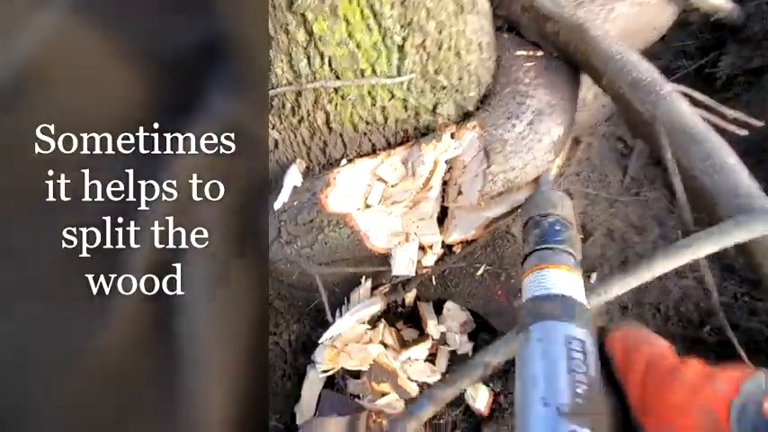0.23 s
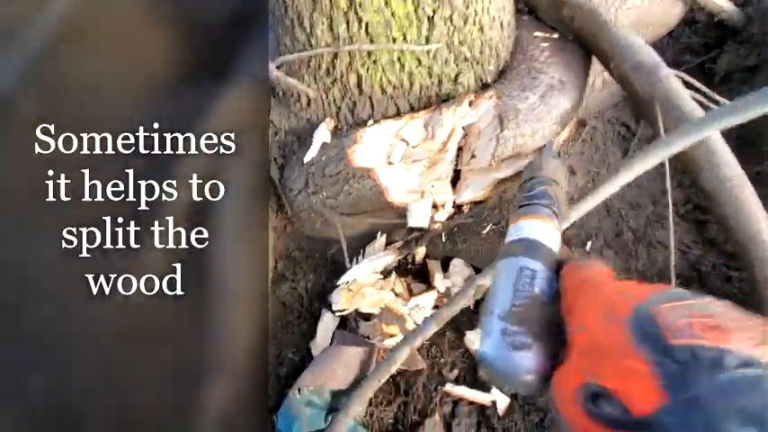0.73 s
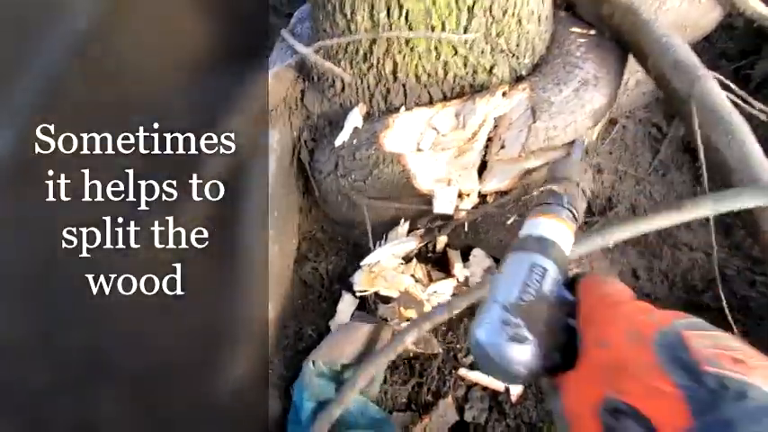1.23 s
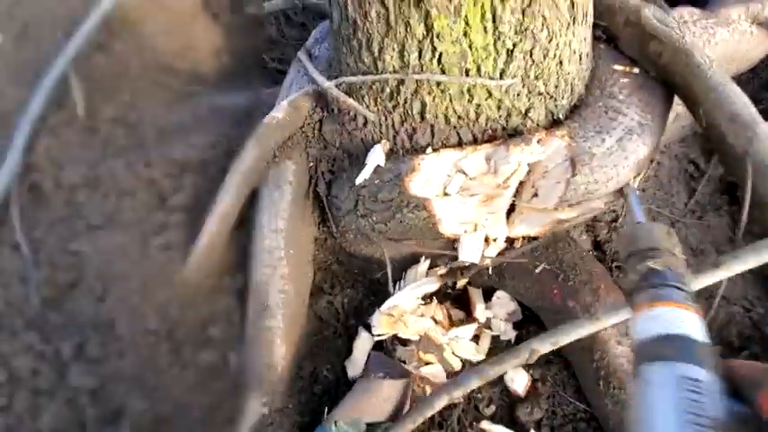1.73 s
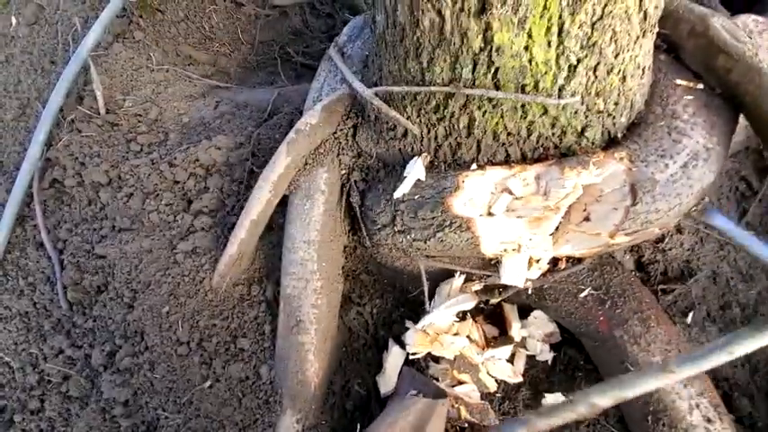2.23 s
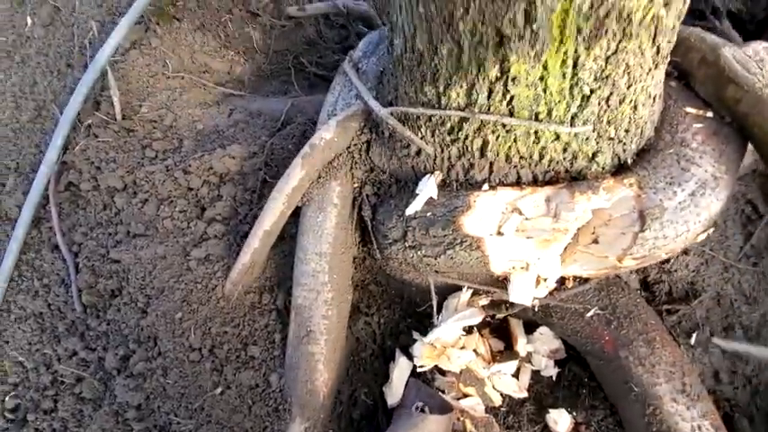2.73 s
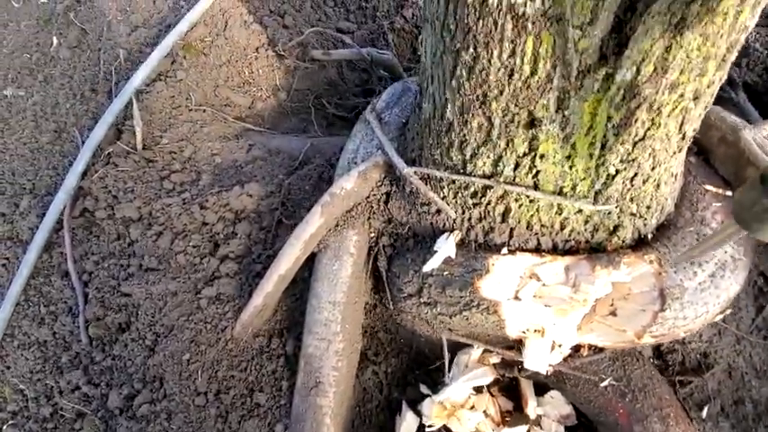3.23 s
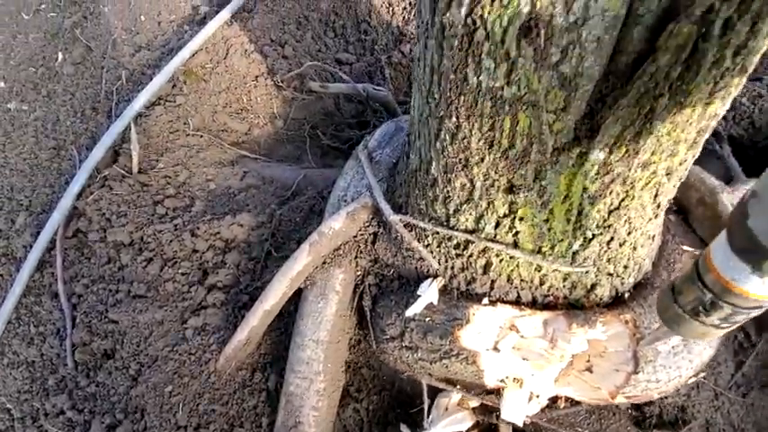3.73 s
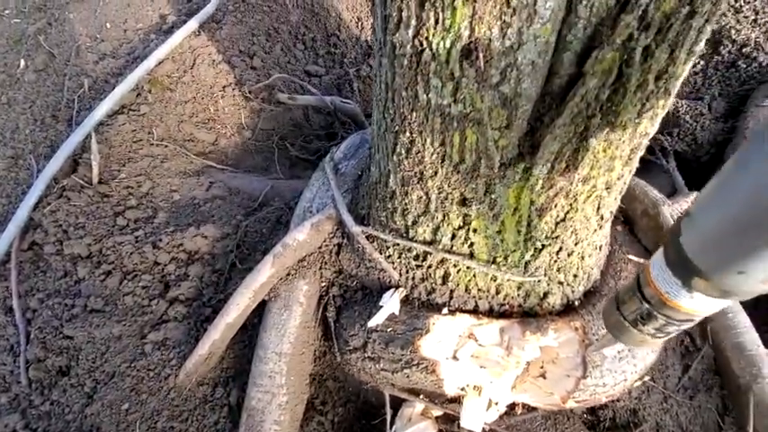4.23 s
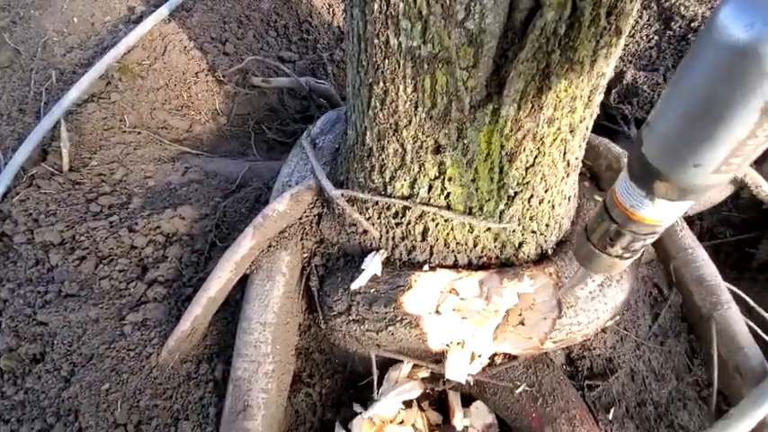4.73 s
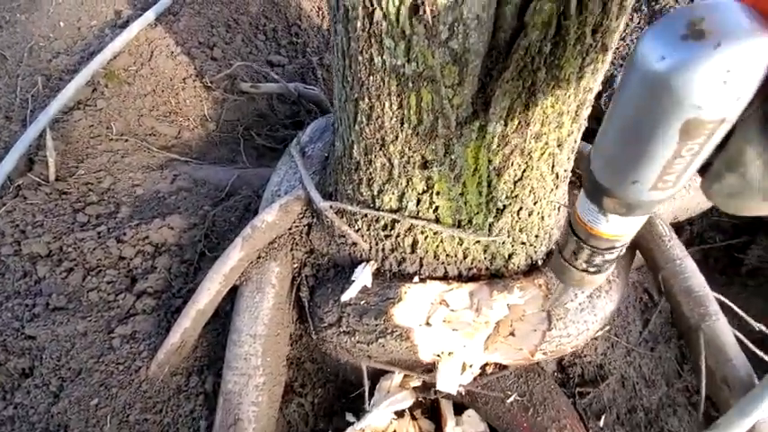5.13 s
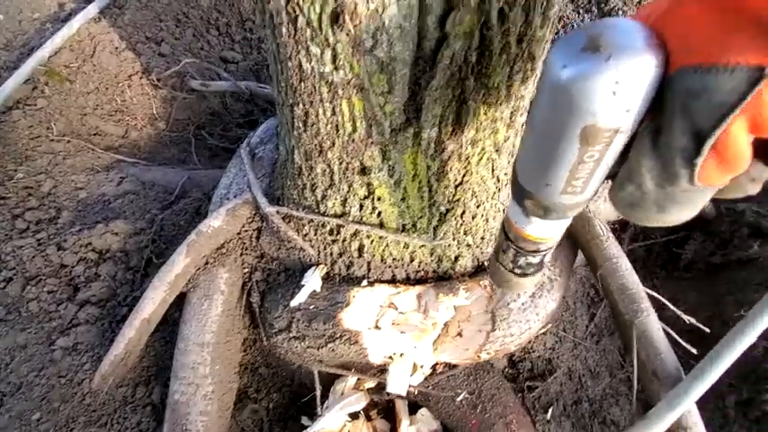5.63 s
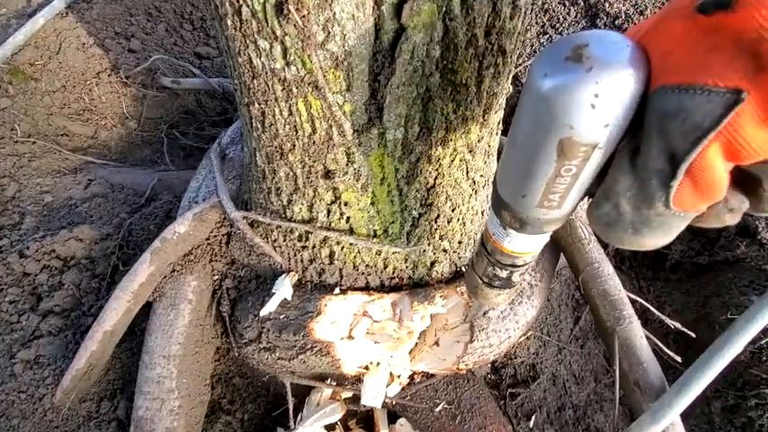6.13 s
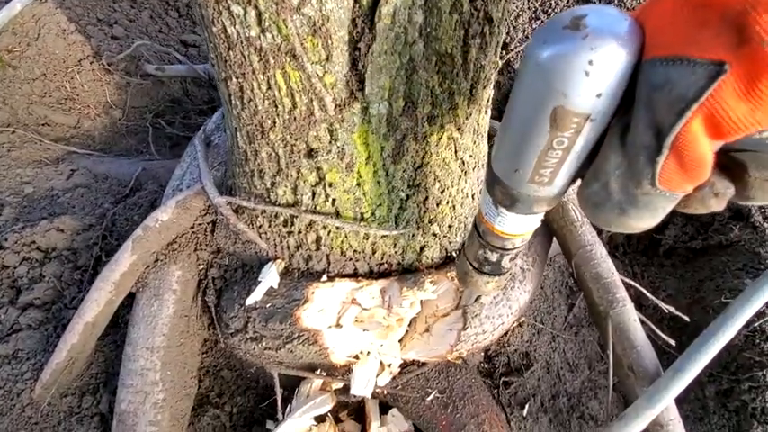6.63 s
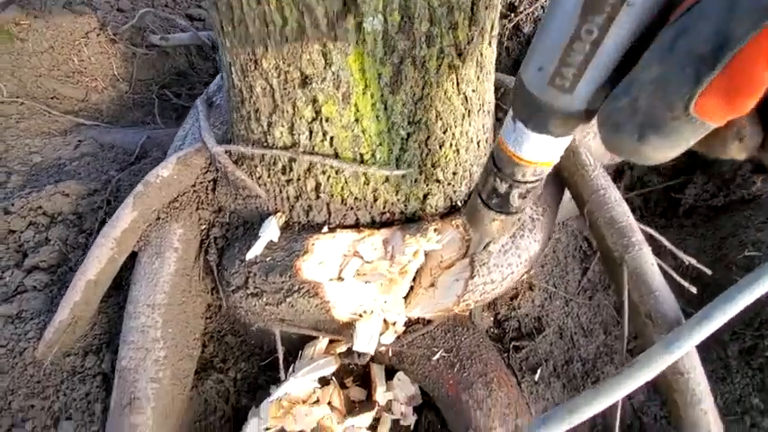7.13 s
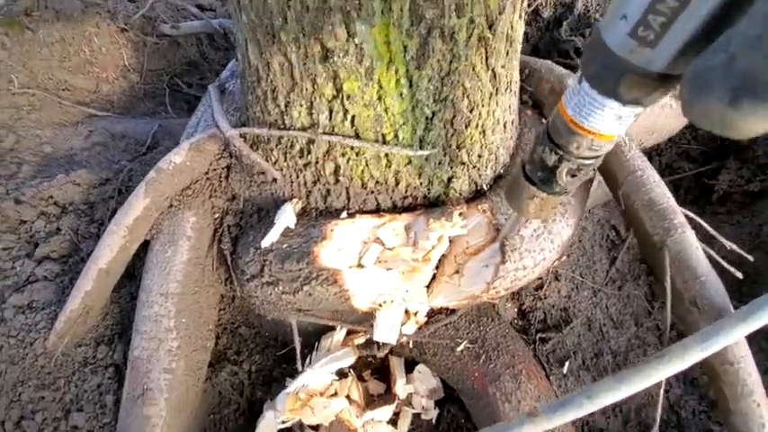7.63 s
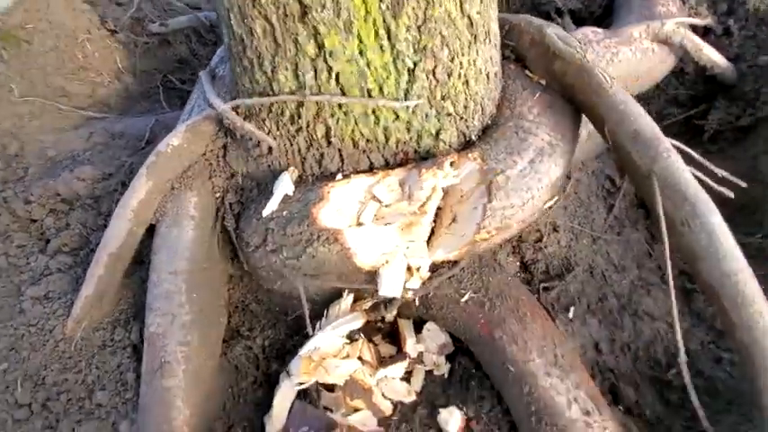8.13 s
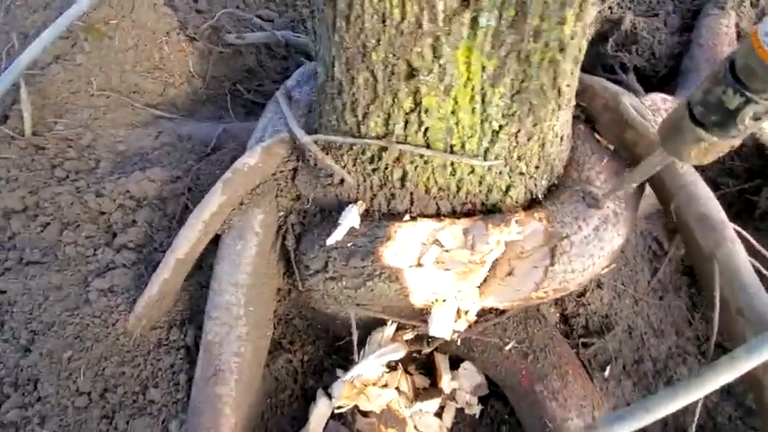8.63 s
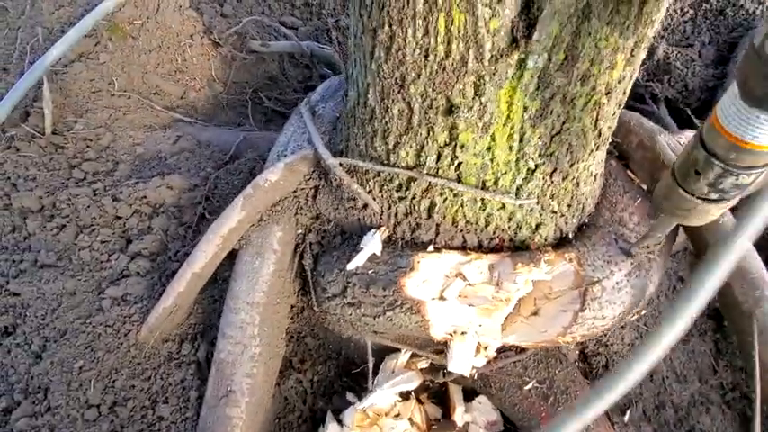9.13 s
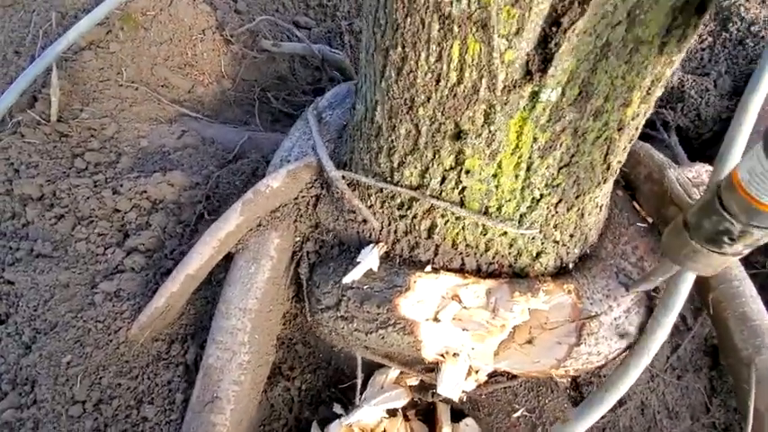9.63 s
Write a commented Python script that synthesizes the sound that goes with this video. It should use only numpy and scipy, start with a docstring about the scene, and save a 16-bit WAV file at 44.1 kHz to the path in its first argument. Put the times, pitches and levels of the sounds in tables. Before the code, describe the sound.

A compressor engine drones outdoors throughout, with an air leak that hisses and gives a thin, wavering whistle. At about 0.4 seconds an air chisel, close and slightly to the left, fires three quick blows with hollow thuds on a tree root. The compressor swells, and the loose bit and hose give scattered light metallic clicks until about 3.5 seconds.

From 4.7 to 7.1 seconds the chisel hammers loudly and rapidly, slowing slightly as the bit seats. The rattle combines sharp steel cracks, low thumps, wooden knocks and puffing exhaust air, with a growing dry rasp of tearing fibres. The compressor sinks beneath it.

More clicks follow between 7.1 and 9 seconds, and the drone swells again around 8.2 seconds. At 9.6 seconds a short, faster burst of hammering ends the scene.

```python
"""An air chisel is driven into a tree root outdoors, close to the left microphone port. First a compressor
engine drones and a leak hisses and whistles; at 0.4 s a feathered trigger fires three blows. The background
swells and the tool clicks as it is moved. From 4.7 to 7.1 s the chisel hammers and the bit seats: each piston
cycle is a thump, a steel crack with a knock of the wood, a return thump and a puff of exhaust. More clicks
follow over the drone, and at 9.6 s a short, faster burst ends the scene."""
import sys
import numpy as np
from scipy import signal
from scipy.fft import rfft, irfft, next_fast_len
from scipy.io import wavfile

SR = 44100
rng = np.random.default_rng(int(sys.argv[2]) if len(sys.argv) > 2 else 0)


def transcribe(u):
    """Save the signal u as a 16-bit wav file named by the first command-line argument.

    u: samples, shape (n,) or (channels, n), limited to [-1, 1]; the rate is SR.
    q: integer samples, one column per channel.
    """
    v = np.clip(np.atleast_2d(u).T, -1, 1)
    q = np.round(v * 32767).astype(np.int16)
    wavfile.write(sys.argv[1], SR, q)


N = 436590
TIME = np.arange(N) / SR
FFT_SIZE = next_fast_len(N + 8192)
BIN_HZ = np.maximum(np.arange(FFT_SIZE // 2 + 1) * SR / FFT_SIZE, 1)

# Table levels are relative: each layer adds its own trim.
# stereo image of the noises: f/Hz, left-right likeness/0-1
LIKENESS = [(60, 0.41), (250, 0.45), (600, 0.27), (2000, 0.69), (4000, 0.06), (9000, 0.33), (16000, .3)]
# how much duller the right port hears the compressor and the tool: f/Hz, level/dB
ENGINE_SHADE = [(60, -1.4), (220, -3), (500, -6.5), (900, -12), (1800, -2), (3000, -8.5), (4400, -7),
                (6000, -14), (8000, -26), (10500, -14), (15600, -21)]
TOOL_SHADE = [(60, -7), (300, -5.5), (600, -9.5), (1100, -12), (1600, -11), (2150, -5), (2900, -15),
              (4200, -7.5), (6000, -20.5), (8000, -25), (9200, -25), (15600, -24)]

# engine orders, with weak quarter orders from the slower pump: multiple of the crank rate, level/dB
ENGINE_ORDERS = [(1, 0), (1.25, -80), (1.5, -24), (1.75, -23), (2, -5), (2.75, -26.5), (3, -45), (3.5, -38),
                 (4, -34), (5, -34.5), (6, -36.5), (7, -52)]
# colour of the engine clatter: f/Hz, level/dB
CLATTER_EQ = [(25, 11), (50, 21), (100, 13), (190, 16.5), (250, 10), (330, 3.5), (620, 3), (820, 1),
              (1050, 1), (1330, 0.5), (1620, -0.5), (2050, 1), (3200, -2), (4400, -1.5), (15000, -42)]
# whines of pump and fan: f/Hz, level/dB
WHINES = [(220.3, -23), (564.3, -29.5), (673, -39), (996, -34.5), (1130.2, -38.5)]
# colours of the leak's hiss and of its breathy upper tone: f/Hz, level/dB
HISS_EQ = [(2500, -14), (4500, 3), (6200, 3.5), (7400, -3.5), (9200, 3.5), (12000, 0), (15600, -1),
           (16500, -20)]
BREATHY_EQ = [(3000, -43), (4000, -25), (4330, -9), (4470, 3), (4640, -5.5), (5200, -29), (7000, -55)]
# fader ride of the whistle: t/s, pure tone level/dB, breathy tone level/dB
WHISTLE_RIDE = [(.25, -26, -42), (.7, -31, -41), (2, -29, -29), (2.5, -34, -30), (3.05, -25, -28),
                (3.6, -26.5, -32), (3.8, -21, -32), (3.95, -28.5, -28), (4.55, -28, -29), (7.25, -34, -42),
                (7.55, -24, -36), (8.2, -26, -23), (8.75, -24.5, -42), (9.05, -34, -49), (9.55, -31.5, -47)]
# the background sinks around the work, then swells: sink t/s, swell t/s, level/dB
LULLS = [(-.1, 0.752, -8), (4.652, 8.163, -9), (9.622, 9.9, -11)]
# swing of the microphone from the root towards the trunk: t/s, share/0-1
MIC_SWING = [(0, 0), (1.2, 0.29), (2.8, 0.18), (3.35, 0.85), (4.5, .9), (7.6, 0.72), (8.2, 0.07), (9.2, .9)]

# clicks of the loose bit and hose: t/s, level/dB, ring f/Hz, decay/s
CLICKS = [(0.8193, -19.5, 12000, .001), (1.0347, -24, 11930, .002), (1.3243, -10, 12060, 0.00068),
          (2.3857, -19.5, 8920, .0022), (3.4826, -17.5, 8050, .004), (3.509, -21, 3800, 0.015),
          (3.5301, -21, 5270, 0.0056), (7.1182, -23, 9000, 0.0018), (7.2082, -8.5, 4340, 0.0018),
          (7.246, -22, 5200, 0.0017), (7.265, -28, 5800, .002), (7.4594, -15.5, 8500, 0.0007),
          (7.8863, -23, 8040, .001), (7.974, -23, 9000, .003), (8.0509, -17.5, 6700, 0.0025),
          (8.065, -23, 9000, 0.0027), (8.0792, -18, 12000, .0018), (8.183, -22, 10000, .0018),
          (8.5013, -19.5, 10950, 0.0035), (9.049, -22.5, 9050, 0.0018)]
# trigger pulls: open t/s, close t/s, rush level/dB, treble over rush/dB, opening spit level/dB
TRIGGER_PULLS = [(0.368, 0.394, -37.5, -2.5, -42), (0.397, .502, -39.5, -5, -25),
                 (4.644, 7.058, -28, -8, -20), (7.077, 7.1, -34.5, -9, -40), (9.634, 9.903, -32, -2, -21.5)]
# colours of the exhaust's rush and of its bright spray: f/Hz, level/dB
RUSH_EQ = [(150, 5.5), (500, -0.5), (1000, -5), (1700, -7), (2600, -2), (4300, 2), (5800, -1.5),
           (7300, -12), (9000, -20), (16000, -40)]
SPRAY_EQ = [(5000, -3.5), (7400, -6.5), (9000, 4), (11500, -5.5), (14500, -3), (15650, -5), (16500, -20)]
# how hard the hand leans on the tool: t/s, level/dB
HAND_PUSH = [(4.67, 3), (4.85, 5.5), (5.1, 0.9), (5.8, 0.8), (5.95, 3.5), (6.42, -1.5), (6.65, 4), (6.8, 0),
             (7.07, 1)]
# piston speed in the two bursts, slowing as the bit seats: t/s, blow rate/Hz
LONG_BURST = [(4.6716, 36.07), (5.1, 34.17), (5.5, 33.13), (6.3, 32.66), (6.6, 33.21), (7.07, 32.89)]
LAST_BURST = [(9.6555, 42.5), (9.8, 39.9), (9.895, 39.3)]
# sustained bursts: speed curve, crack/dB, wood/dB, split/dB, high ring/dB, background dip/dB
BURSTS = [(LONG_BURST, -10.5, -24, -15, -23, -5.5), (LAST_BURST, -18, -23.5, -3, -7, -8.5)]
# lone blows as the trigger is feathered or let go:
# t/s, crack/dB, wood/dB, wood pitch ratio, split/dB, high ring/dB
LONE_BLOWS = [(0.4148, -10, -35, 1.4, -20, -36), (.449, -11.5, -37, 1.2, -22.5, -32),
              (0.4883, -15, -37, 0.51, -19.5, -38), (4.662, -12, -42, 1, -44, -28),
              (7.107, -11.5, -30, .81, -21, -32), (9.6426, -8.5, -25, 0.85, -17, -31)]
# low, hollow thuds with the lone blows and a few knocks: t/s, level/dB, f/Hz
THUDS = [(0.407, -12.5, 227), (0.4465, -23, 275), (.485, -19.5, 260), (7.208, -27, 550),
         (7.949, -21.5, 340), (9.641, -13.5, 298)]
# modes of the root under the bit: f/Hz, level/dB, t60/s
WOOD_MODES = [(332.6, -7, 0.045), (588, 2.5, 0.019), (734, -14.5, 0.021), (1214, -8, 0.036),
              (1576, -9.5, 0.031), (2290, -9, 0.016)]
# colours of tearing fibres, the steel crack and the bit's high ring: f/Hz, level/dB
SPLIT_EQ = [(500, -29), (1000, 1), (1350, 2.5), (1700, -1), (2250, 2.5), (2900, -9), (4000, -17.5)]
CRACK_EQ = [(400, -27), (900, -23), (1500, -16), (2300, -3), (3000, 5), (5500, 2.5), (7400, -3), (8900, 3),
            (10400, 4), (13000, -3), (14600, -0.5), (15650, 4), (16500, 9.5)]
HIGH_RING_EQ = [(13500, -52), (15000, -9), (15650, 12), (15900, -6), (16500, -31)]


def from_db(db):
    """Decibels to gain."""
    return 10 ** (np.asarray(db) / 20)


def in_time(rows):
    """Each column of an automation curve, sample by sample."""
    times, *columns = np.transpose(rows)
    return [np.interp(TIME, times, column) for column in columns]


def over_hz(points):
    """An EQ curve, bin by bin."""
    hz, value = np.transpose(points)
    return np.interp(np.log(BIN_HZ), np.log(hz), value)


def drift(rate_hz):
    """A random wobble with a spread of about one."""
    knots = rng.standard_normal(int(N / SR * rate_hz) + 2)
    return np.interp(TIME * rate_hz, np.arange(len(knots)), knots)


def gate(start, stop, attack_s, release_s):
    """Rises to one from the start, holds, and falls back after the stop."""
    return np.clip(np.minimum((TIME - start) / attack_s, 1 - (TIME - stop) / release_s), 0, 1)


def delayed(x, lag_s):
    """The same sound a little later; the lag may move."""
    return np.interp(TIME - lag_s, TIME, x)


def noise(eq, shade, band):
    """Coloured stereo noise with unit power within the band (Hz) on the left; the right is shaded."""
    white = rng.standard_normal((2, len(BIN_HZ))) + 1j * rng.standard_normal((2, len(BIN_HZ)))
    alike, gain = over_hz(LIKENESS), from_db(over_hz(eq))
    in_band = (BIN_HZ > band[0]) & (BIN_HZ < band[1])
    gain *= FFT_SIZE / (2 * np.sqrt(np.sum(gain[in_band] ** 2)))
    right = (alike * white[0] + np.sqrt(1 - alike ** 2) * white[1]) * from_db(over_hz(shade))
    return irfft(np.array([white[0], right]) * gain, FFT_SIZE)[:, :N]


def at_ports(x, shade):
    """A mono sound in stereo: untouched on the left, shaded on the right."""
    right = irfft(rfft(x, FFT_SIZE) * from_db(over_hz(shade)), FFT_SIZE)[:N]
    return np.array([x, right])


def strikes(times, sizes):
    """A train of one-sample impulses."""
    return np.bincount(np.maximum(times * SR, 0).astype(int), sizes, N)[:N] + 1e-18


def ring(hits, hz, t60):
    """Each impulse sets a sine of its own height ringing."""
    radius, angle = from_db(-60 / (t60 * SR)), 2 * np.pi * hz / SR
    return signal.lfilter([0, np.sin(angle)], [1, -2 * radius * np.cos(angle), radius ** 2], hits)


def fade(hits, decay_s):
    """Each impulse starts an exponential decay."""
    return signal.lfilter([1], [1, -np.exp(-1 / (decay_s * SR))], hits)


def swell(hits, width_s):
    """Each impulse becomes a bell-shaped swell around its moment."""
    lag = np.arange(-1024, 1025) / SR
    return signal.oaconvolve(hits, np.exp(-.5 * (lag / width_s) ** 2), "same")


def ground_comb(x, lag_s, strength=0.16, dull_hz=2900):
    """A dull reflection from the soil hollows the sound like a moving comb."""
    dull = signal.sosfiltfilt(signal.butter(2, dull_hz, fs=SR, output="sos"), x)
    return x + strength * np.array([delayed(port, lag_s) for port in dull])


def engine(swing, crank_hz=56.12, drone_db=1.08, clatter_db=-19, throb=0.1):
    """The bed: a drone on the orders of the crankshaft, and clatter that throbs on each turn."""
    turn = 2 * np.pi * crank_hz * TIME + .025 * drift(14)
    drone = np.zeros(N)
    for order, db in ENGINE_ORDERS:
        waver = 1 + 0.038 * (order - .5) * drift(20)
        drone -= np.sqrt(2) * from_db(db + drone_db) * np.cos(order * turn) * waver
    clatter = noise(CLATTER_EQ, ENGINE_SHADE, band=(600, 2500))
    clatter = ground_comb(clatter, lag_s=0.000954 + 0.00023 * swing)
    clatter *= from_db(clatter_db - 1.5 * swing) * (1 + throb * np.cos(turn))
    return at_ports(drone, ENGINE_SHADE) + clatter


def whines(swing, trim_db=4, swing_db=-2, waver_db=3, swing_lag_s=0.00034):
    """Wavering tones of pump and fan; the two ports drift out of phase as the microphone swings."""
    tones = np.zeros(N)
    for hz, db in WHINES:
        gain = from_db(db + trim_db + swing_db * swing + waver_db * drift(8))
        tones += gain * np.sin(2 * np.pi * hz * TIME + drift(9))
    left, right = at_ports(np.sqrt(2) * tones, ENGINE_SHADE)
    return np.array([left, delayed(right, swing_lag_s * swing)])


def leak(swing, whistle_hz=3957, whistle_db=11, right_db=-4.5, pulse_hz=28, hiss_db=-24):
    """A fitting hisses and whistles; the pulsing supply warbles the whistle, and its upper tone sputters."""
    pure_db, breathy_db = in_time(WHISTLE_RIDE)
    warble = 0.7 * np.sin(2 * np.pi * pulse_hz * TIME)
    phase = 2 * np.pi * whistle_hz * TIME + warble + 0.92 * drift(11) + 0.25 * drift(120)
    whistle = from_db(pure_db + whistle_db + 3.5 * drift(70)) * np.sin(phase)
    breathy = noise(BREATHY_EQ, ENGINE_SHADE, band=(4000, 5000)) * from_db(breathy_db + 3 * drift(60))
    hiss = noise(HISS_EQ, ENGINE_SHADE, band=(9000, 15000)) * from_db(hiss_db - 5.5 * swing)
    return whistle * from_db([[0], [right_db]]) + breathy + hiss


def compressor_fader(steady_db=-15.5, sink_s=0.06):
    """Gain of the compressor: steady, lower in each lull, and lower still while the chisel hammers."""
    lull_db = sum(db * gate(sinks, swells, sink_s, release_s=0.32) for sinks, swells, db in LULLS)
    dip_db = sum(db * gate(speed[0][0], speed[-1][0], sink_s, release_s=.12) for speed, *_, db in BURSTS)
    return from_db(steady_db + lull_db + dip_db)


def handling(trim_db=-3.5):
    """The loose bit and hose give short metallic clicks, each bright around a pitch of its own."""
    clicks, t = np.zeros(N), TIME[:2048]
    for at, db, hz, decay_s in CLICKS:
        band = signal.butter(1, [hz / 1.8, min(hz * 1.4, .45 * SR)], "band", fs=SR, output="sos")
        click = signal.sosfilt(band, rng.standard_normal(len(t)) * np.exp(-t / decay_s))
        start = int(at * SR)
        clicks[start:start + len(t)] += from_db(db + trim_db) * 2 * click / np.abs(click).max()
    return at_ports(clicks, TOOL_SHADE)


def air_flow(open_s=0.0056, close_s=0.011, spit_s=0.023, sag_s=0.12):
    """Envelopes of the rush and its treble: each pull opens with a spit, sags to a steady flow and shuts."""
    flow, treble = np.zeros((2, N))
    push_db = 0.41 * in_time(HAND_PUSH)[0]
    for opens, closes, rush_db, treble_db, spit_db in TRIGGER_PULLS:
        valve = gate(opens, closes, open_s, close_s)
        age = np.maximum(TIME - opens - open_s, 0)
        fresh = np.exp(-age / sag_s)   # a rested hose gives extra air and treble until its pressure sags
        rush = from_db(rush_db + push_db + 2.5 * fresh)
        spit = from_db(spit_db) * np.exp(-age / spit_s)
        flow += valve * np.hypot(rush, spit)
        treble += valve * np.hypot(rush * from_db(treble_db + 5 * fresh), spit * from_db(-6.5))
    return flow, treble


def exhaust(at, trim_db=-2, puff_delay_s=0.019, flutter_db=2.5):
    """Air rushes while the trigger is held and puffs out on each return stroke."""
    flow, treble = air_flow()
    strokes = strikes(at + puff_delay_s, rng.uniform(0.26, 2.0, len(at)))
    puffs = 1 + 0.77 * swell(strokes, width_s=0.0021)
    rush = flow * noise(RUSH_EQ, TOOL_SHADE, band=(2000, 6500))
    spray = treble * noise(SPRAY_EQ, TOOL_SHADE, band=(9000, 15000))
    return (rush + spray) * puffs * from_db(trim_db + flutter_db * drift(300))


def piston_blows(seat_s=0.46, cut_s=1, loose_pitch=0.757, seated_pitch=1.028):
    """The hit list, in the columns of LONE_BLOWS: those blows, then one per piston cycle of each burst."""
    rows = [np.array(LONE_BLOWS)]
    for speed, crack_db, wood_db, split_db, ring_db, _ in BURSTS:
        knots, rate_hz = np.transpose(speed)
        t = TIME[(TIME >= knots[0]) & (TIME <= knots[-1])]
        cycles = np.cumsum(np.interp(t, knots, rate_hz)) / SR
        at = np.interp(np.arange(int(cycles[-1]) + 1), cycles, t)
        age = at - at[0]
        push_db = np.interp(at, *np.transpose(HAND_PUSH))
        loose = np.exp(-(age / seat_s) ** 4)   # the wood rings lower and weaker until it grips the bit
        uncut = np.exp(-age / cut_s)   # a deeper cut knocks louder and tears more fibres
        knock_db = wood_db + push_db - 5 * loose - 3.5 * uncut
        pitch = seated_pitch + (loose_pitch - seated_pitch) * loose
        tear_db = split_db + push_db - 40.5 * uncut
        columns = [at, crack_db + push_db, knock_db, pitch, tear_db, np.full(len(at), ring_db)]
        rows.append(np.transpose(columns))
    return np.vstack(rows).T


def recurring(sound, at, share):
    """The same body answers every blow, so a share of its dense ring repeats."""
    samples = np.arange(N)
    starts = np.sort((at * SR).astype(int)) - 150
    latest = np.maximum(np.searchsorted(starts, samples, "right") - 1, 0)
    retriggered = sound[:, np.abs(samples - starts[latest])]
    return np.sqrt(share) * retriggered + np.sqrt(1 - share) * sound


def low_thuds(t60=0.036):
    """Each thud rings one low, hollow tone at a pitch of its own."""
    thuds = sum(ring(strikes(np.array([at]), from_db([db])), hz, t60) for at, db, hz in THUDS)
    return at_ports(thuds, TOOL_SHADE)


def barrel_recoil(at, crack_db, lead_s=.0037, return_s=0.01208):
    """The low end: the barrel thumps just before the blow and again as the piston is thrown back."""
    size = from_db(crack_db + rng.standard_normal(len(at)))
    forward_hits = strikes(at - lead_s, size)
    return_hits = strikes(at + return_s + 0.00022 * rng.standard_normal(len(at)), size)
    forward = from_db(-7) * ring(forward_hits, hz=210, t60=0.011)
    kick = from_db(-12.5) * ring(forward_hits, hz=120, t60=0.011)
    back = from_db(-9) * ring(return_hits, hz=155, t60=0.039)
    return at_ports(forward + kick + back, TOOL_SHADE)


def root_knocks(at, wood_db, pitches, split_db, knock_trim_db=8.5, spread_db=2.9):
    """The body: every blow knocks the wood's modes and, deep in the cut, tears fibres with a dry rasp."""
    knocks, t = np.zeros(N + 4096), TIME[:4096]
    hz, mode_db, t60 = np.transpose(WOOD_MODES)[:, :, None]
    for start, blow_db, pitch in zip((at * SR).astype(int), wood_db, pitches):
        peak_db = blow_db + knock_trim_db + mode_db + spread_db * rng.standard_normal(hz.shape)
        modes = from_db(peak_db - 60 * t / t60) * np.sin(2 * np.pi * pitch * hz * t)
        knocks[start:start + len(t)] += modes.sum(axis=0)
    rasp = recurring(noise(SPLIT_EQ, TOOL_SHADE, band=(800, 3000)), at, share=.6)
    rasp *= fade(strikes(at - .0005, from_db(split_db)), decay_s=0.007)
    return at_ports(knocks[:N], TOOL_SHADE) + rasp


def steel_cracks(at, crack_db, ring_db, spread_db=1.64, spit_lead_s=.0026):
    """The attack: the piston uncovers a port with a spit, then cracks on the bit, which sings very high."""
    size = from_db(crack_db + spread_db * rng.standard_normal(len(at)))
    hits = strikes(at, size)
    spit = from_db(-13) * fade(strikes(at - spit_lead_s, size), decay_s=.0012)
    snap = swell(hits, width_s=0.00052)
    tail = from_db(-6.5) * fade(hits, decay_s=0.0041)
    crack = recurring(noise(CRACK_EQ, TOOL_SHADE, band=(2500, 16000)), at, share=.4)
    high_ring = noise(HIGH_RING_EQ, TOOL_SHADE, band=(14000, 16500))
    high_ring *= swell(strikes(at, from_db(ring_db)), width_s=0.0013)
    return (spit + snap + tail) * crack + high_ring


def scene(ground_db=-32, ground_s=.0042, port_lag_s=.00034, swing_lag_s=.00009):
    """The mix: the chisel and its ground reflection over the compressor; the right port hears all later."""
    at, crack_db, wood_db, pitches, split_db, ring_db = piston_blows()
    swing, = in_time(MIC_SWING)
    chisel = steel_cracks(at, crack_db, ring_db) + root_knocks(at, wood_db, pitches, split_db)
    chisel += barrel_recoil(at, crack_db) + low_thuds() + exhaust(at) + handling()
    chisel += from_db(ground_db) * np.pad(chisel, ((0, 0), (int(ground_s * SR), 0)))[:, :N]
    compressor = engine(swing) + whines(swing) + leak(swing)
    left, right = chisel + compressor_fader() * compressor
    return np.array([left, delayed(right, port_lag_s + swing_lag_s * swing)])


def record(dry, low_cut_hz=12, ceiling=.95, high_cut_hz=15950):
    """The master chain: a low cut, a soft clip that rounds the hardest cracks, and a steep high cut."""
    dry = signal.sosfilt(signal.butter(1, low_cut_hz, "high", fs=SR, output="sos"), dry)
    rounded = dry / (1 + (dry / ceiling) ** 4) ** (1 / 4)
    return signal.sosfilt(signal.ellip(12, .2, 90, high_cut_hz, fs=SR, output="sos"), rounded)


dry = scene()
out = record(dry)
transcribe(out)
```